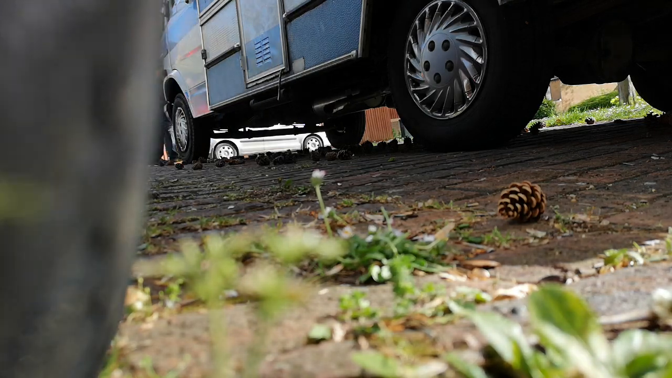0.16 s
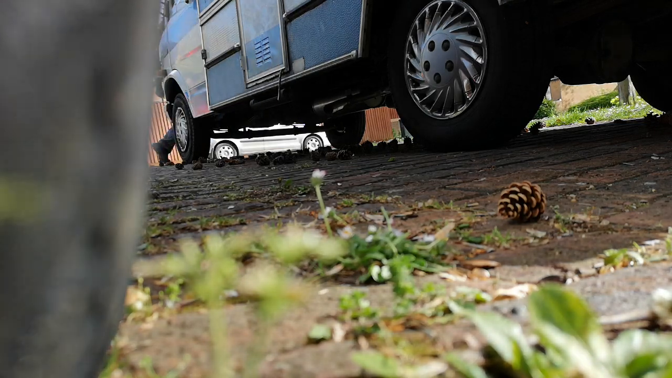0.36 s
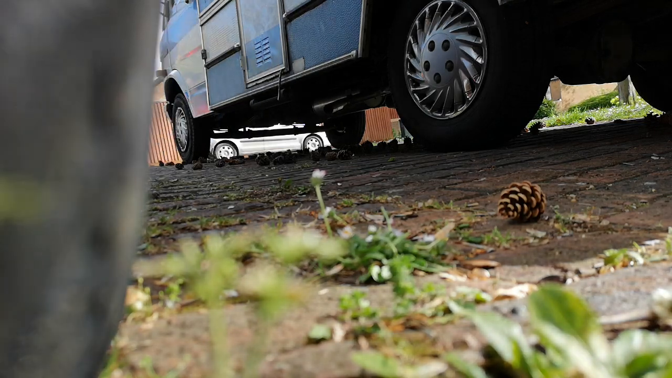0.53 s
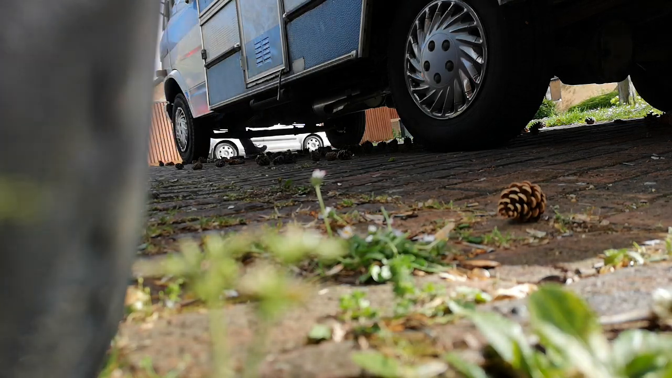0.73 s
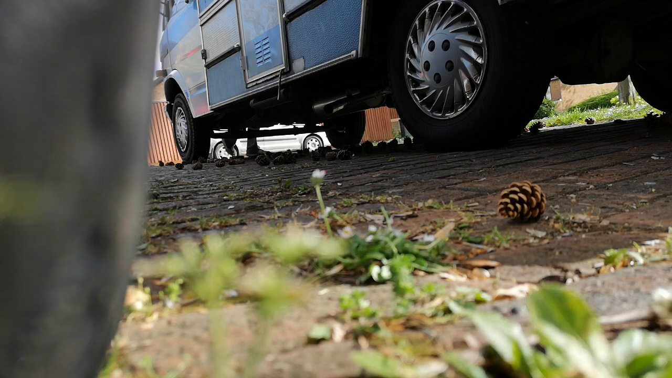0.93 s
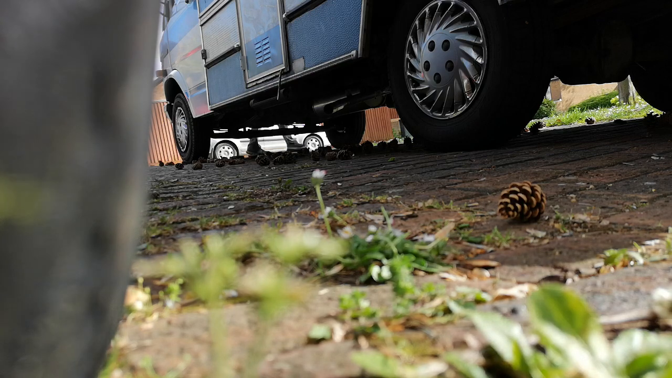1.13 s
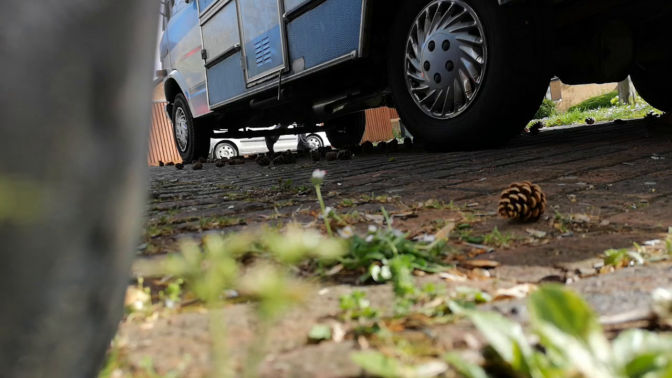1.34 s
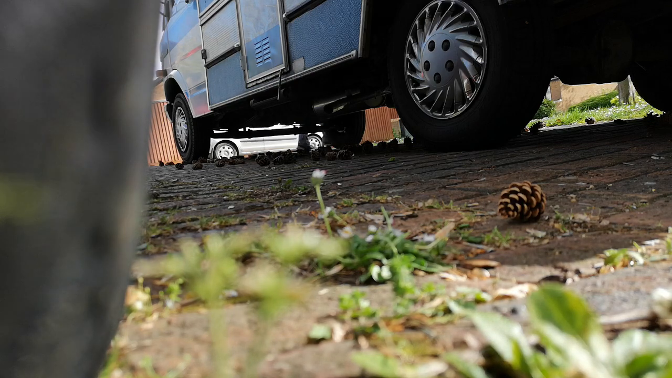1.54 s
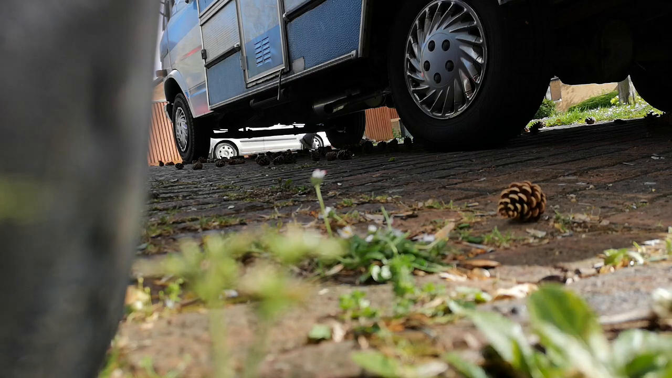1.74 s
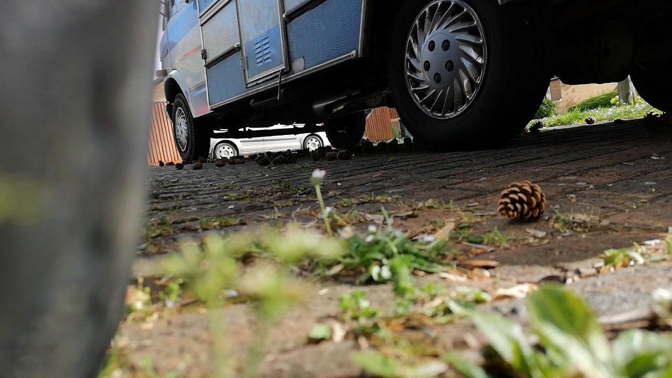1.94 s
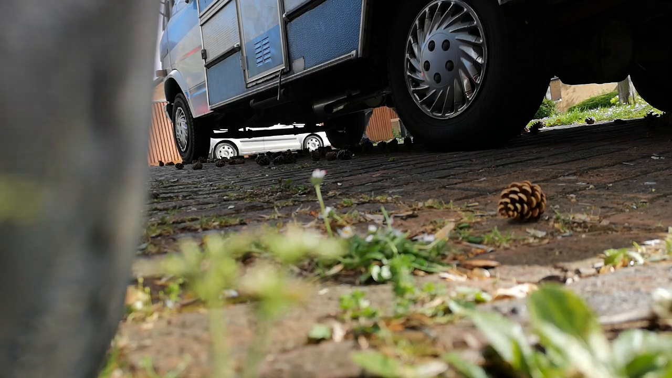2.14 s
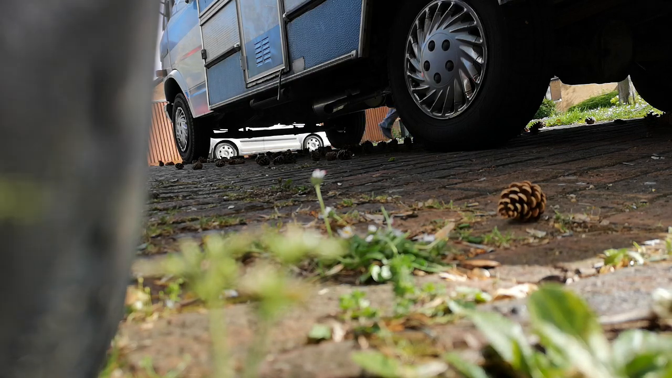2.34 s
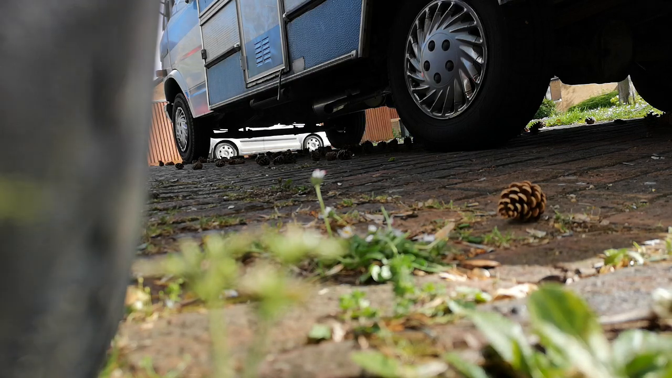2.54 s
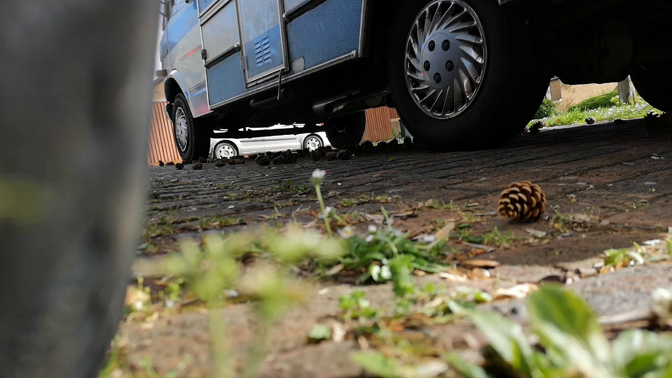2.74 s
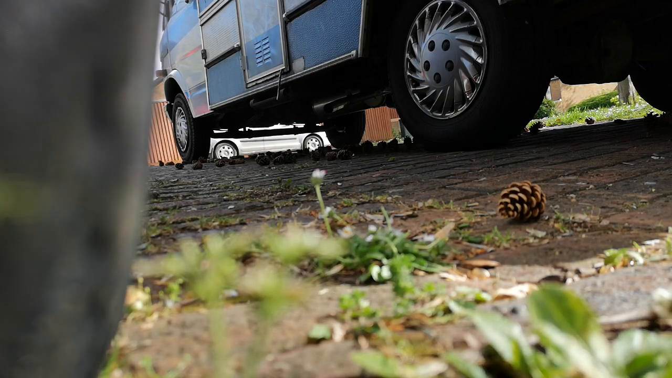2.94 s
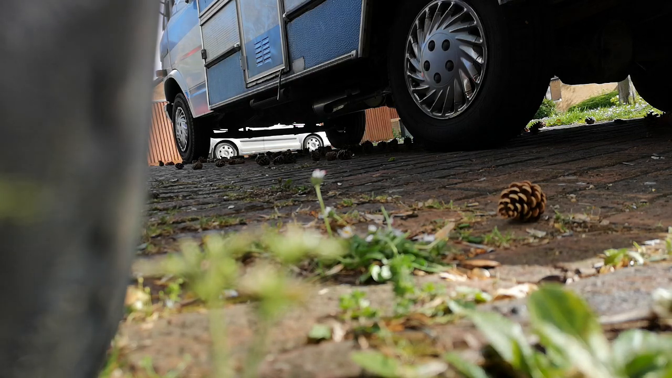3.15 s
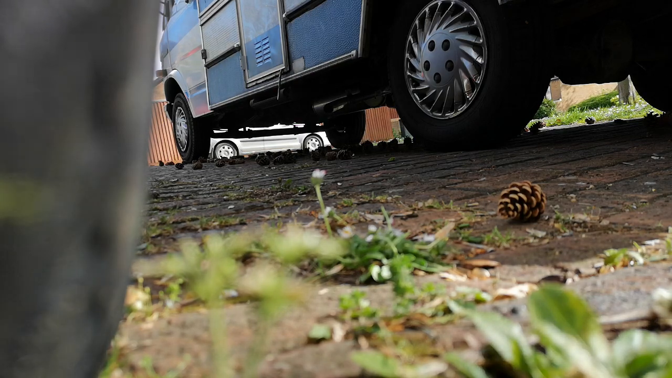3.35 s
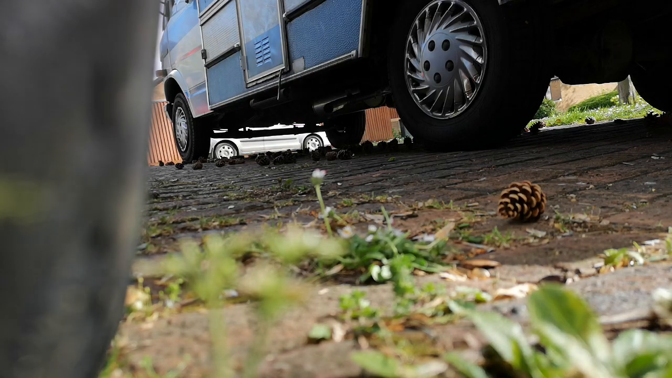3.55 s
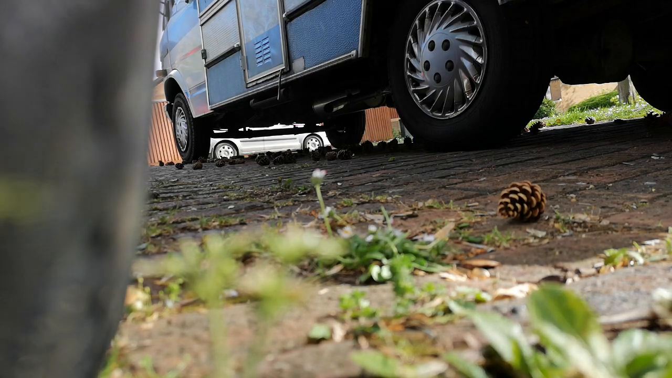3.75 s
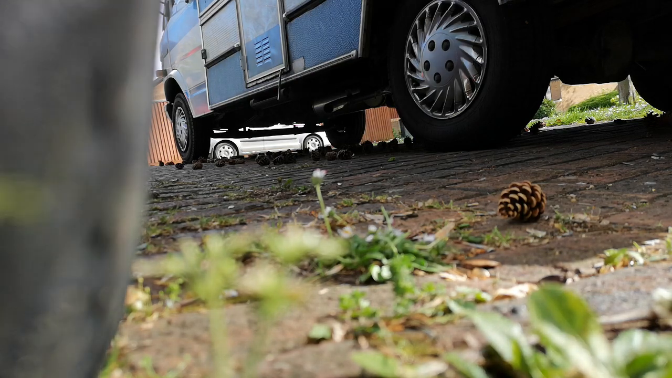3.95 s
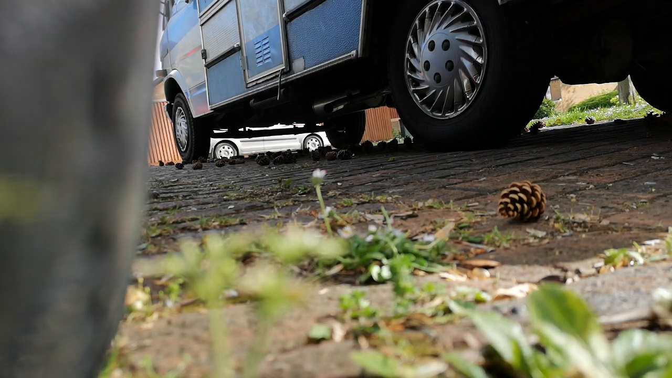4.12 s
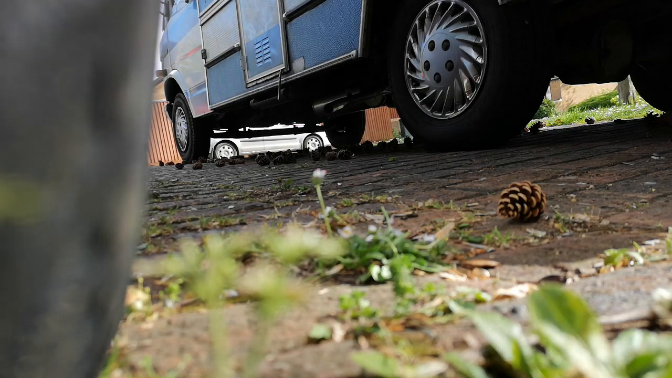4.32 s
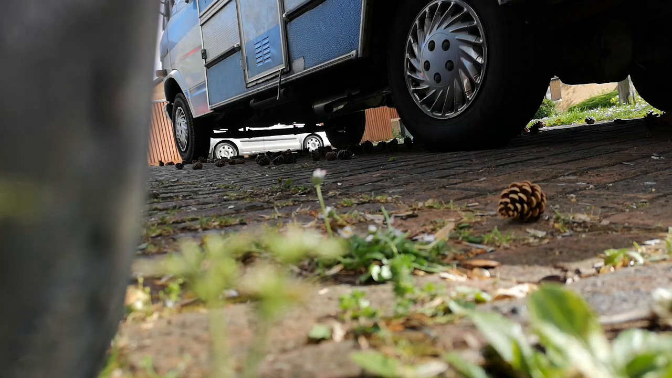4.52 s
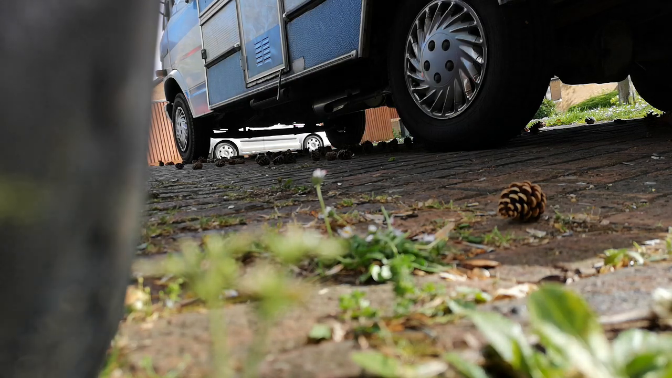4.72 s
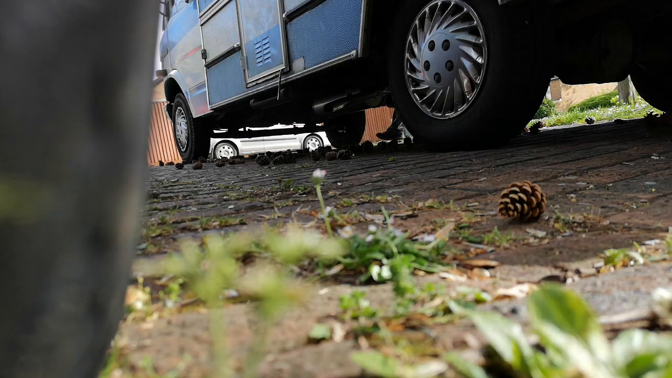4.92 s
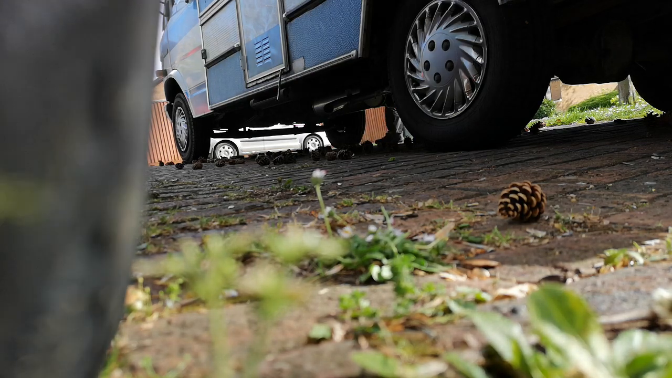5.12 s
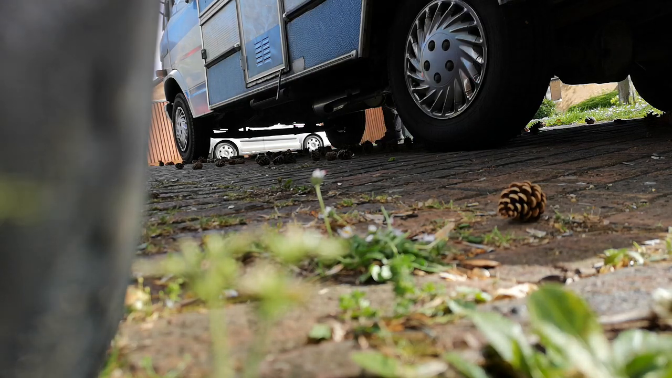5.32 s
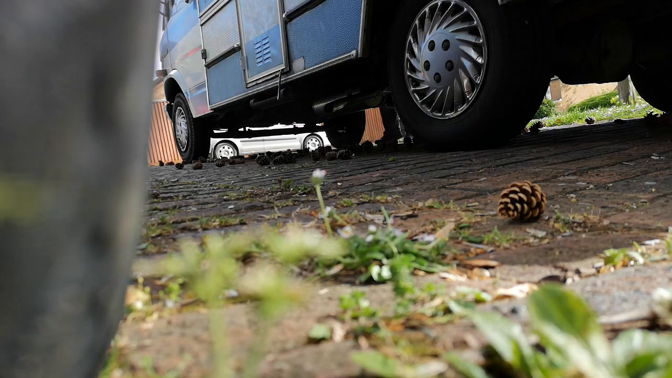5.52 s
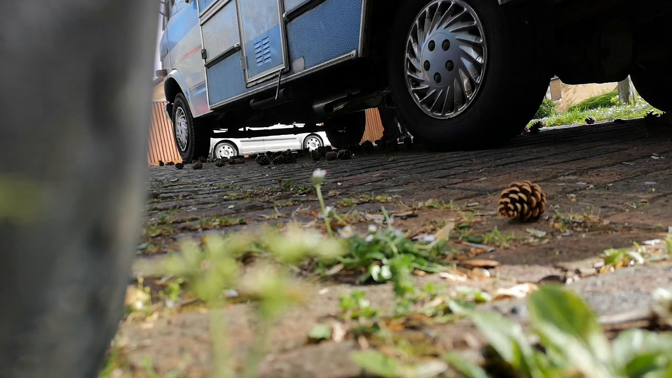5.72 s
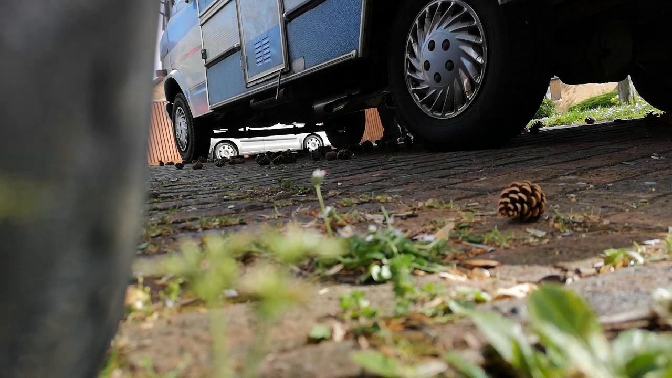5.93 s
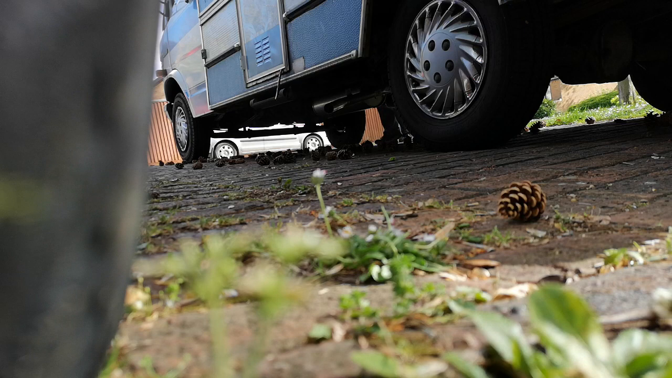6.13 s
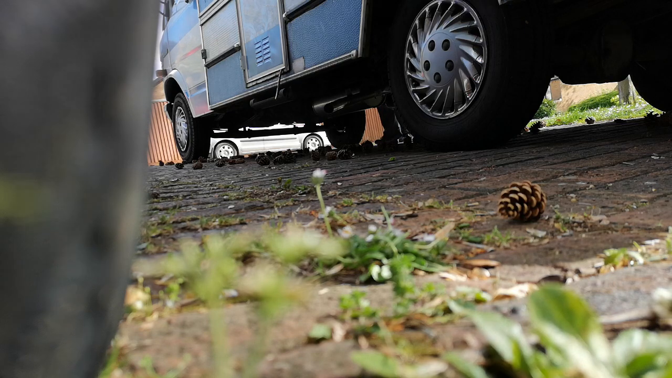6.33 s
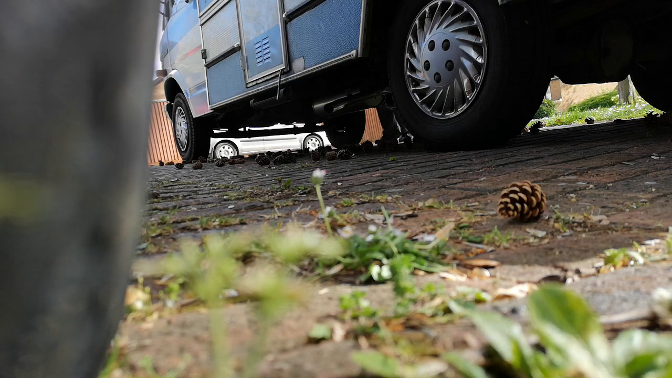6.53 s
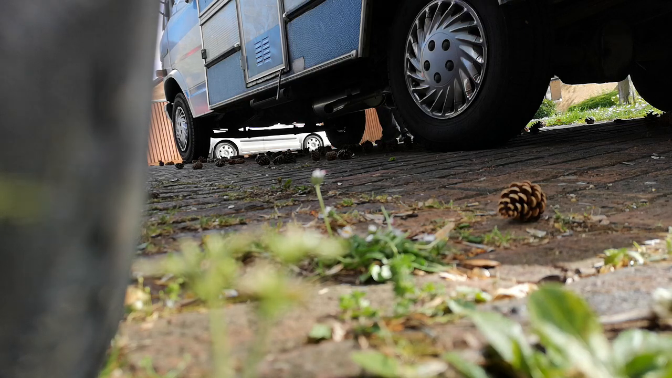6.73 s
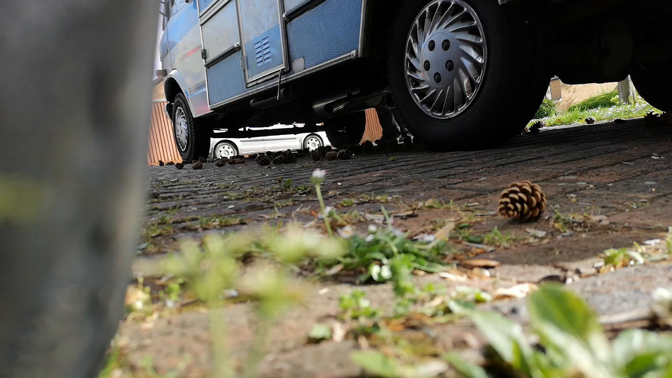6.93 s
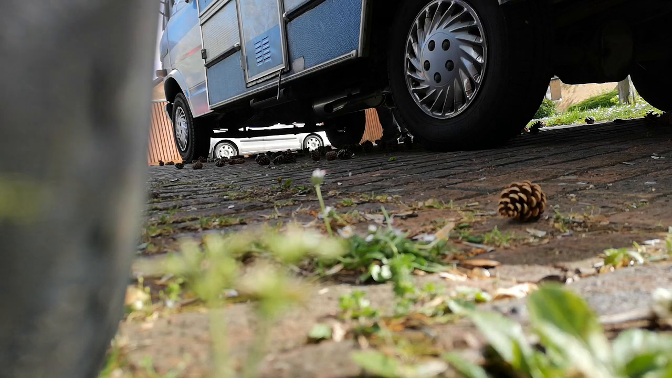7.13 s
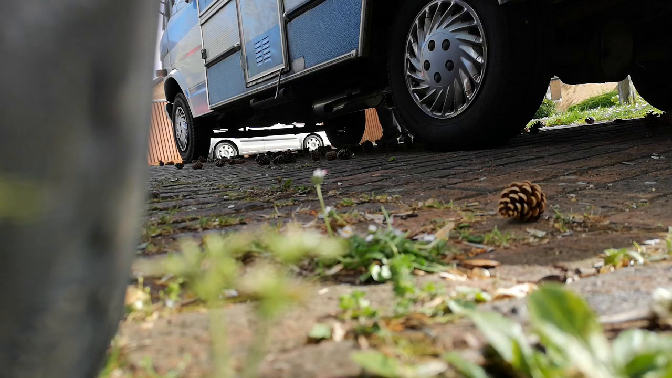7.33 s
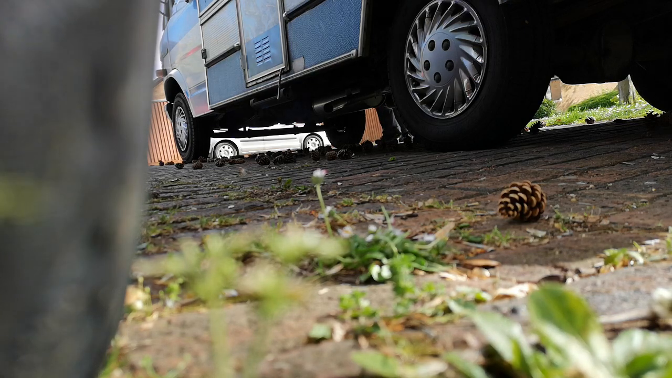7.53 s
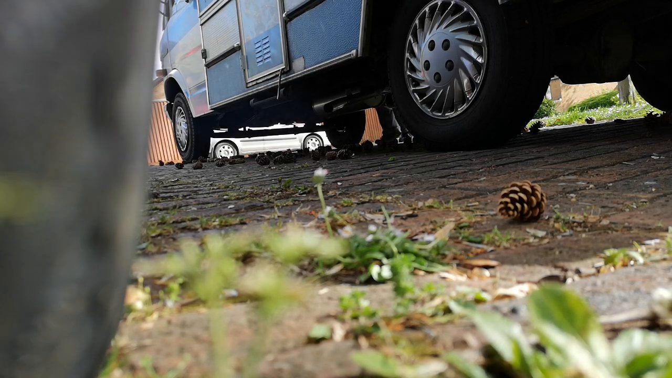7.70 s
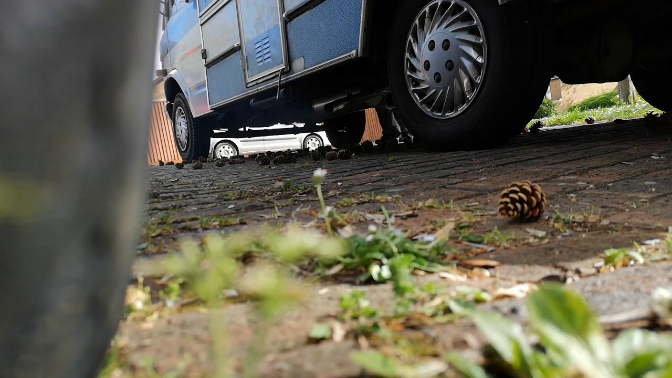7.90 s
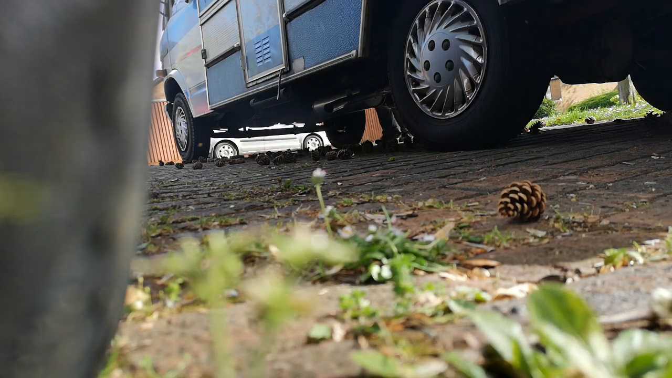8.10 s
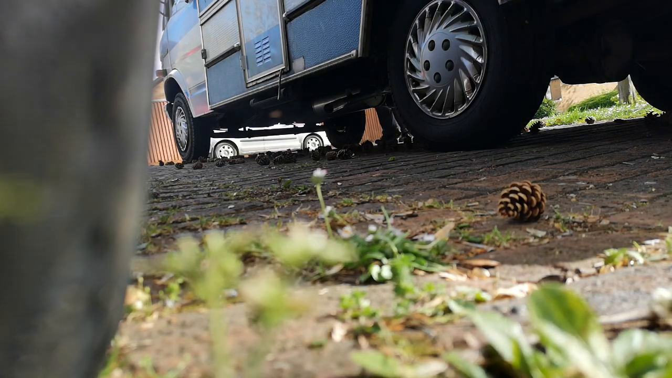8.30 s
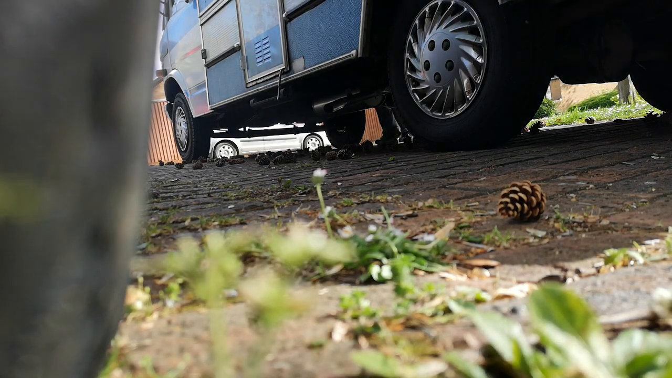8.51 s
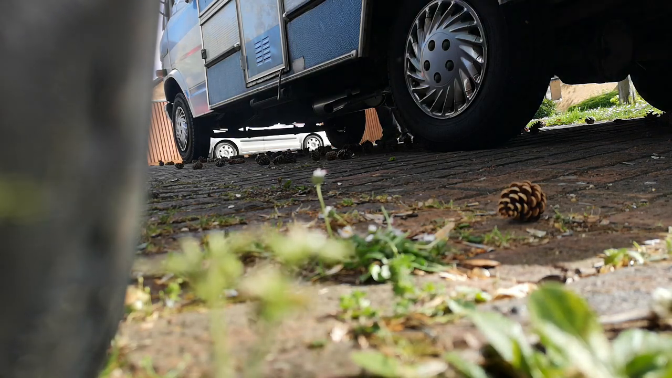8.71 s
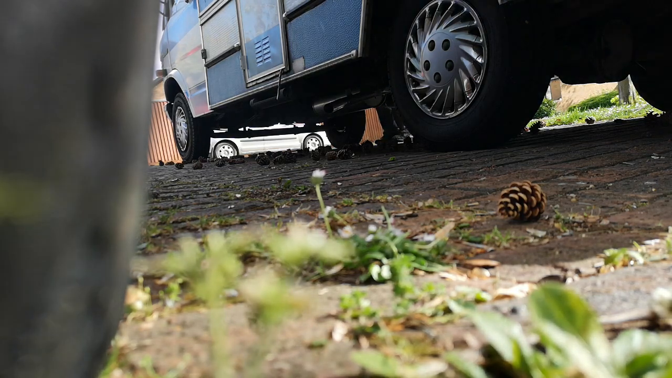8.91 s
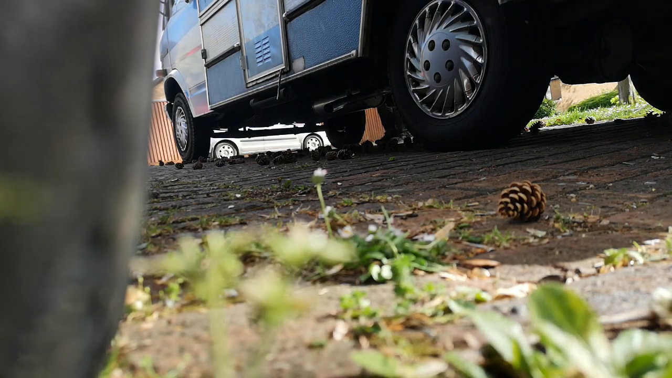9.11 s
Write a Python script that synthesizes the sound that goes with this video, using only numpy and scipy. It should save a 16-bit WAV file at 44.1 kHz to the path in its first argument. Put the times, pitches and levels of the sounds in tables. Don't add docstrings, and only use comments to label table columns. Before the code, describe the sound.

Close stereo perspective at ground level, outdoors beside a van's exhaust. From 0 to about 7 seconds a four-cylinder diesel idles steadily, roughly 25 firings a second: a low, lumpy hum of uneven puffs ringing in the silencer, fluttering gas, knocks from the block, brisk valve and injector ticks, and a soft mechanical whirr. Distant traffic rumbles, with one car faintly swelling around 3.6 seconds. At about 7.1 the pedal goes down; sharp metallic bangs and rattling clatter burst in uneven bouts while pitch climbs about fourfold by 7.8. A dry snap clicks near 7.6. The throttle shuts around 7.8, the exhaust dips for an instant, then returns as a full, booming drone with a sheet-metal roar, peaking near 8.0 and gliding down. A thin two-tone belt whine sinks beneath it; more litter snaps come near 8.4 and 8.6. It ends around 9.3, still above idle.

```python
import sys
import numpy as np
from scipy import signal
from scipy.fft import rfft, irfft, next_fast_len
from scipy.io import wavfile
from scipy.ndimage import uniform_filter1d, map_coordinates

SR = 44100
rng = np.random.default_rng(int(sys.argv[2]) if len(sys.argv) > 2 else 0)


def wav_record(signal):
    frames = np.transpose(np.atleast_2d(signal))
    bounded = np.clip(frames, -1, 1)
    quanta = np.round(bounded * 32767).astype(np.int16)
    wavfile.write(sys.argv[1], SR, quanta)


def magnitude_from_level(level_db):
    exponent = np.asarray(level_db, float) / 20
    return 10 ** exponent


N = 408366
T = np.arange(N) / SR
IDLE_RATE = 24.72
SHUT_S, REFILL_S = 7.82, 0.096


def unit(x):
    return x / np.sqrt(np.mean(x ** 2) + 1e-20)


def along(points, hz):
    f, v = np.transpose(points)
    return np.interp(np.log(hz + 1), np.log(f + 1), v)


def curves(rows):
    s, *cols = np.transpose(rows)
    return [np.interp(T, s, c) for c in cols]


def wobble(rate):
    return map_coordinates(rng.standard_normal(int(N * rate / SR) + 4), [T * rate], order=2)


def summed(*dbs):
    return 10 * np.log10(sum(magnitude_from_level(db) ** 2 for db in dbs) + 1e-12)


def filtered(x, response):
    m = next_fast_len(N + 8192)
    return irfft(rfft(x, m) * response(np.fft.rfftfreq(m, 1 / SR)), m)[..., :N]


def coloured(x, spectrum):
    return unit(filtered(x, lambda hz: magnitude_from_level(along(spectrum, hz))))


def resonance(hz, centre, width):
    return 1j * hz * width / (centre ** 2 - hz ** 2 + 1j * hz * width)


def ringing(x, modes):
    return filtered(x, lambda hz: sum((-1) ** k * magnitude_from_level(db) * resonance(hz, centre, width)
                                      for k, (centre, width, db) in enumerate(modes)))


def pair(alike):
    one, own = rng.standard_normal(N), rng.standard_normal((2, N))
    share = np.clip(alike + .25 * (alike > 0), 0, .9)
    return np.sqrt(share) * one + np.sqrt(1 - share) * own


def steady(x):
    return x / np.sqrt(np.abs(uniform_filter1d(np.mean(x ** 2, 0), size=SR // 6)) + 1e-12)


def blows(crank, places, dbs, t60, scatter_db):
    where = (np.arange(0, crank[-1], 4)[:, None] + places).ravel()
    size = magnitude_from_level(np.resize(dbs, where.size) + scatter_db * rng.standard_normal(where.size))
    at = np.searchsorted(crank, where)
    hits = np.bincount(at[at < N], size[at < N], N)
    return signal.lfilter([1], [1, -magnitude_from_level(-60 / (t60 * SR))], hits)


# (centre [Hz], width [Hz], level [dB], path delay [s])
CHAMBERS = [(33.7, 4, -37.3, .0416), (49.6, 4, -37, 0), (152.9, 13.9, -35.7, .0201),
            (185.4, 4.1, -37.4, .0179), (244.6, 6.5, -52, .0187)]
# (size [dB], lateness [firings], extra in the fourth chamber [dB])
PUFFS = [(3.4, -.068, 2.6), (2, -.081, 6.4), (-.3, -.07, -.9), (4.3, -.067, 1.1)]


def idle_orders(crank):
    orders = np.arange(2, 57) / 4
    hz, (size_db, late, extra_db) = orders * IDLE_RATE, np.transpose(PUFFS)
    turns = np.exp(-2j * np.pi * orders[:, None] * (np.arange(4) + late))
    z = 0
    for i, (centre, width, db, delay) in enumerate(CHAMBERS):
        puffs = np.mean(magnitude_from_level(size_db + extra_db * (i == 3)) * turns, 1)
        z = z + magnitude_from_level(db) * resonance(hz, centre, width) * np.exp(-2j * np.pi * hz * delay) * puffs
    stray_db = -58 - 8 * (orders > 8) * (orders % .5 > 0) + 2 * rng.standard_normal(orders.size)
    z += magnitude_from_level(stray_db) * np.exp(2j * np.pi * rng.random(orders.size)) * (np.abs(z) < magnitude_from_level(-54))
    rate = np.gradient(crank) * SR
    out = 0
    for k, a in zip(orders, z):
        choke_db = -.3 * np.clip(k * rate - max(195, k * (IDLE_RATE + .5)), 0, None)
        level = np.sqrt(2) * np.abs(a) * magnitude_from_level(choke_db + 0.61 * wobble(4.4))
        out = out + level * np.cos(2 * np.pi * k * crank + np.angle(a))
    return out


def tone(crank, k):
    phase = 0.29 - 0.1162 * k - 0.01318 * k * k + rng.uniform() * (k % 1 > 0)
    return np.sqrt(2) * np.cos(2 * np.pi * (k * crank + phase))


def opening_db(k):
    open_s, rise_s, lag_s = 7.1, .18, 0.024
    return -45 * np.clip(1 - (T - open_s - lag_s * (k - 1)) / rise_s, 0, 1)


# (frequency [Hz], level [dB])
FLOOR_PAN = [(190, 0.5), (280, -7), (360, 0), (450, -5), (620, -11), (800, 2.5), (950, -2.5), (1200, 3.5)]


def minor_orders(crank, rate, effort):
    out = 0
    for k in [q / 4 for q in range(1, 57) if (q > 16 or q % 4) and (q < 24 or q % 2 == 0)]:
        k_db = max(-23 - 6.5 * max(k - 1.5, 0), -42.5) + 4 * (k % 1 == .5) + 8 * (k % 1 == 0)
        out = out + magnitude_from_level(k_db + along(FLOOR_PAN, k * rate) + 1.7 * wobble(3.3)) * tone(crank, k)
    return magnitude_from_level(-13 + 4 * effort - 0.33 * (103 - rate) + opening_db(4)) * out


# (frequency [Hz], level [dB])
PULLING = [(35, -26), (62, -21), (75, -45), (86, -29), (135, -11), (178, -15), (270, -33.5), (500, -37)]
# (frequency [Hz], level [dB])
COASTING = [(80, -17.5), (103, -19.5), (147, -20.5), (173, -34.5), (195, -18.5), (240, -39.5), (375, -35.5),
            (410, -52)]


def exhaust(crank, rate, load, effort):
    crank = crank + .004 * wobble(6)
    slump_db = -15 * np.exp(-np.abs(T - SHUT_S) / REFILL_S) * (1 - load)
    pull = np.where(T < SHUT_S - REFILL_S, 1, load)
    out = magnitude_from_level(13 * effort - 1.3 * np.clip(rate - 34, 0, None)) * idle_orders(crank)
    for k, overtone_db in enumerate([6, 0, -2.5, -3.5, -8, -9, -7, -17], 1):
        pipe_db = pull * along(PULLING, k * rate) + (1 - pull) * along(COASTING, k * rate) + slump_db
        out += magnitude_from_level(pipe_db + opening_db(k) + overtone_db + .5 * wobble(7)) * tone(crank, k)
    out += minor_orders(crank, rate, effort)
    pump_db = -58 + 3.1 * wobble(18) - 3 * np.clip(rate - 25, 0, 30)
    return out + magnitude_from_level(pump_db) * tone(crank, 25)


CYLINDERS = [-5.5, -2, 0, 0]
# (centre [Hz], width [Hz], level [dB])
CASTING = [(648.5, 18, -8), (1213, 130, -13), (1522, 78, -5), (1664, 43, 1.5), (2282, 104, -8),
           (2680, 29, -20)]


def knock(crank, over, fast, load):
    fire = blows(crank, np.arange(4) + .54, CYLINDERS, t60=0.1, scatter_db=3)
    knock_db = -38.5 + 5.5 * over + 1.3 * wobble(5.8) - 3 - 9 * fast * (1 - load) - 19 * load
    return steady(ringing(fire * pair(.55), CASTING)) * magnitude_from_level(knock_db)


# (place [firings of four], low tick [dB], high tick [dB])
VALVES = [(.55, -12, -1.5), (1.55, -8.5, -2), (1.8, 1, -0.5), (2.3, -11.5, -6.5), (2.8, -5, -5.5),
          (3.6, -4.5, -8), (3.798, -4, -9)]


def valve_blows(crank):
    place, low_db, high_db = np.transpose(VALVES)
    low = blows(crank, place, low_db, t60=0.089, scatter_db=2.0) + 0.21
    high = blows(crank, place, high_db, t60=0.075, scatter_db=4.0) + 0.32
    return uniform_filter1d(low, size=150), uniform_filter1d(high, size=150)


# (frequency [Hz], level [dB])
LOW_TICK = [(1650, -10.5), (2800, 0.5), (3070, -7.5), (3400, -3), (3740, -11.5), (4330, -10), (5130, -10.5),
            (5550, -15), (6030, -10.5), (6400, -12.5), (8320, -45), (14100, -120)]
# (frequency [Hz], level [dB])
HIGH_TICK = [(3530, -39), (6000, -5), (6530, -5), (7080, 2), (7790, 2.5), (9320, -7.5), (11400, -18),
             (15000, -45)]


def ticks(low, high, over, fast, load, effort, clack_db):
    out = magnitude_from_level(10 - 5.3 * load) * steady(coloured(low * pair(0.16), LOW_TICK))
    out += magnitude_from_level(2.0) * steady(coloured(high * pair(0.11), HIGH_TICK))
    tick_db = summed(-58.5 + 1.64 * over ** 2 + 23 * effort, clack_db)
    return out * magnitude_from_level(tick_db - 5.7 * fast)


# (frequency [Hz], level [dB])
BODY = [(220, -25), (380, -5), (426, -9), (569, -10.5), (624, -11.5), (851, -7), (1250, -9), (1360, -7),
        (1670, -3), (2050, -7.5), (3400, -20.5), (3850, -26.5), (4500, -38), (5850, -35), (9900, -120)]
# (frequency [Hz], level [dB])
ROAR = [(220, -36), (380, -6.5), (558, -27), (783, 0.5), (1000, -5.5), (1170, 3), (1340, -6.5),
        (1660, -2.5), (2600, 3), (3270, -20.5), (3640, -12.5), (4520, -23.5), (6240, -24.5), (7280, -13.5),
        (15000, -55)]
# (centre [Hz], width [Hz], level [dB])
PANELS = [(501, 39, -7.5), (828, 42, 2.5), (895, 19, -3.5), (1113, 25, -13), (1248, 24, 7), (1300, 39, -6),
          (1500, 37, 3.5), (1580, 36, -7), (1590, 94, -2), (2245, 5.8, 13.5), (2510, 27, 2), (2626, 40, 4),
          (3584, 34, -5.5)]


def whirr(low, over, fast, load, effort, deep_db):
    whirr_db = -50 + 10 * np.log2(1 + over) + 4 * effort
    whirr_db += .12 * np.clip(deep_db + 45.5, 0, None)
    idle = coloured((3.7 + 0.052 * low) * pair(0.057), BODY)
    idle *= magnitude_from_level(whirr_db + 10.5 - 8.36 * np.maximum(fast, load))
    shake = magnitude_from_level(1.85 * wobble(30)) * pair(0.18)
    roar = coloured(shake, ROAR) + 0.46 * unit(ringing(shake, PANELS))
    return idle + roar * np.sqrt(fast) * magnitude_from_level(whirr_db + 4.5 - 9 * load)


# (frequency [Hz], level [dB])
FLUTTER = [(12, -15), (22, -3.5), (35, -18), (100, -10), (180, 1), (230, -10.5), (300, -74)]


def flutter(over, effort):
    middle = coloured(rng.standard_normal(N), FLUTTER)
    side = 0.56 * coloured(rng.standard_normal(N), FLUTTER)
    return (middle + side * [[1], [-1]]) * magnitude_from_level(-56 + 4.5 * over + 6 * effort + 11.5 + 1.6 * wobble(8))


# (frequency [Hz], level [dB])
TRAFFIC = [(120, -27), (200, -15), (225, 0.5), (339, 0), (409, -15.5), (520, -5.5), (680, -45),
           (1140, -120)]


def traffic_and_boom(over, effort):
    pass_s, nearing_s, leaving_s = 3.62, 0.42, 1.3
    away = (T - pass_s) / np.where(T < pass_s, nearing_s, leaving_s)
    boom_db = -38 + 12.5 * effort - 24 * np.clip(1.4 - over, 0, None)
    return coloured(pair(.8), TRAFFIC) * magnitude_from_level(summed(-50, -39 - 6 * away ** 2, boom_db) - 4)


# (centre [Hz], width [Hz], level [dB])
DEEP = [(520, 250, -21), (930, 70, -5), (1150, 130, -7), (1530, 70, 0), (1690, 80, -3), (1500, 900, -10)]
# (centre [Hz], width [Hz], level [dB])
BRIGHT = [(2250, 70, -1), (2540, 55, 0), (2710, 50, 0), (3750, 200, -12), (5600, 400, -24),
          (7400, 350, -17), (12500, 3000, -40)]


def rattle(crank, rings_db):
    crank = crank + np.interp(T, [7.22, 7.3], [.3, 0])
    out = 0
    for modes, level_db, chatter, sharp_s in zip((DEEP, BRIGHT), rings_db, (.02, .21), (.0013, .0005)):
        sharp, loose = [blows(crank, np.arange(4) + .8, [0, -1.5, 0, -1.5], t60, scatter_db=2.5)
                        for t60 in (sharp_s, .07)]
        bang = sharp * (1 + .3 * pair(0)) + chatter * loose * pair(.6)
        out += steady(ringing(bang, modes)) * magnitude_from_level(level_db) * (T > 7.19)
    return out


# (time [s], length [s], deep ring [dB], bright ring [dB], tick [dB])
BOUTS = [
    (7.335, 0.026, -35, -33, -31.5),
    (7.359, 0.074, -19.5, -49, -60),
    (7.433, 0.022, -33, -27, -30),
    (7.487, 0.038, -36, -20, -48),
    (7.522, 0.1, -21, -28, -48),
    (7.64, 0.019, -21, -30, -45),
    (7.682, 0.036, -19, -33, -28),
    (7.74, 0.048, -30, -20.5, -46),
    (7.803, 0.04, -42, -25, -44),
]


def bouts():
    on = [uniform_filter1d(1. * ((T > s) & (T < s + length)), size=500) for s, length, *_ in BOUTS]
    return 20 * np.log10(np.abs(magnitude_from_level(np.array(BOUTS)[:, 2:].T) @ on) + 1e-6)


# (time [s], peak level [dB])
SNAPS = [
    (7.561, -24),
    (8.3789, -26.5),
    (8.3904, -40),
    (8.4044, -42),
    (8.5734, -37),
]


def snaps():
    out, t = np.zeros((2, N + SR)), np.arange(SR // 50) / SR
    for s, db in SNAPS:
        click = np.diff(rng.standard_normal((2, len(t) + 2)), n=2)
        out[:, round(s * SR):][:, :len(t)] += magnitude_from_level(db - 7) * magnitude_from_level(-60 * t / .004) * click
    return out[:, :N]


# (time [s], frequency [Hz], level [dB])
WHINE = [
    (7.7, 805, -70),
    (7.85, 810, -38),
    (8.3, 790, -39),
    (8.8, 760, -40),
    (9.26, 725, -42),
]


def whine():
    hz, db = curves(WHINE)
    turn = 2 * np.pi * np.cumsum(hz) / SR
    lower = magnitude_from_level(db + 2.5 * wobble(9)) * np.sin(turn + .3 * wobble(12))
    upper = magnitude_from_level(db - 3 + 2.5 * wobble(9)) * np.sin(1.43 * turn + .4 * wobble(12))
    return lower + upper


# (frequency [Hz], left minus right [dB])
LEAN = [(60, 0.0), (110, 0.5), (200, 0.0), (380, 0.5), (700, 2.0), (1290, 1.5), (2380, -1.5), (4400, -3.5),
        (8120, -5.0), (15000, -6.0)]
# (frequency [Hz], lead [rad])
LEAD = [(0, 0), (520, 0.1), (780, -3.1), (1210, 0.3), (1640, 0.5), (2330, -2.3), (3270, 0.6), (4220, -2.9),
        (5860, -7.9), (7320, -12.9), (9730, -20.7), (12800, -34.5), (14000, -35.6), (15200, -44.4)]


def at_microphones(engine):
    def paths(hz):
        left_over_right = magnitude_from_level(along(LEAN, hz)) * np.exp(1j * np.interp(hz, *np.transpose(LEAD)))
        return left_over_right ** np.array([[.5], [-.5]])
    return filtered(engine, paths)


# (time [s], firing rate [firings/s])
SPEED = [(0.0, 24.7), (3.5, 24.743), (5.0, 24.7), (6.9, 24.72), (7.1, 25.0), (7.2, 29.5), (7.3, 33.88),
         (7.4, 42.29), (7.5, 55.96), (7.6, 70.92), (7.7, 86.18), (7.8, 97.09), (7.9, 97.59), (8.0, 103.01),
         (8.15, 101.14), (8.4, 94.12), (9.0, 80.4), (9.26, 73.41)]
# (time [s], load [0-1])
LOAD = [
    (7.12, 0),
    (7.19, 1),
    (7.78, 1),
    (7.84, 0),
]
# (time [s], share of full [0-1])
EFFORT = [(7.1, 0.073), (7.16, 0.34), (7.32, 0.78), (7.38, 0.53), (7.44, 1.08), (7.6, 1.05), (7.78, 0.88),
          (7.86, 0.21), (8.0, 0.16)]


def scene():
    (rate,), (load,), (effort,) = curves(SPEED), curves(LOAD), curves(EFFORT)
    crank, over = np.cumsum(rate) / SR, rate / IDLE_RATE - 1
    fast = np.clip((rate - 27) / 60, 0, 1)
    deep_db, bright_db, clack_db = bouts()
    shut_db = -40 * (1 - load)
    rings_db = (summed(-60.5 + 25.5 * effort + shut_db, deep_db),
                summed(-28.5 + over / 3 + shut_db, bright_db))
    low, high = valve_blows(crank)
    engine = knock(crank, over, fast, load)
    engine += ticks(low, high, over, fast, load, effort, clack_db)
    engine += whirr(low, over, fast, load, effort, deep_db)
    engine += rattle(crank, rings_db) + snaps()
    surroundings = flutter(over, effort) + traffic_and_boom(over, effort)
    return at_microphones(engine) + exhaust(crank, rate, load, effort) + whine() + surroundings


def low_pass(x):
    return signal.sosfilt(signal.butter(12, 15620, fs=SR, output="sos"), x)


# (frequency [Hz], level [dB])
HISS = [(5000, -30), (9000, -6), (12000, 6), (15500, 2)]


def record(dry):
    x = dry + magnitude_from_level(-82) * coloured(pair(0), HISS)
    mix = x / (1 + np.abs(x / 2.4) ** 6) ** (1 / 6)
    return low_pass(mix)


dry = scene()
out = record(dry)
wav_record(out)
```